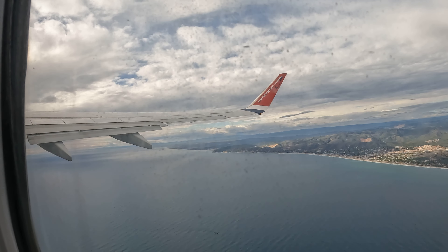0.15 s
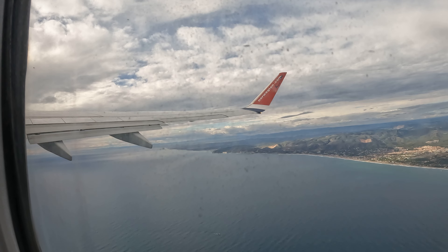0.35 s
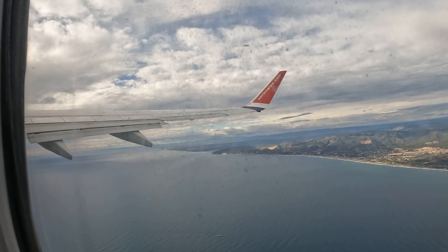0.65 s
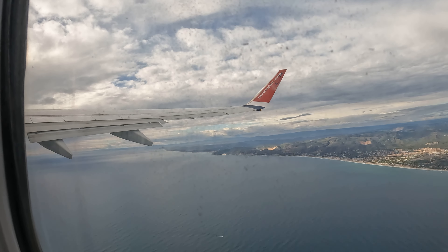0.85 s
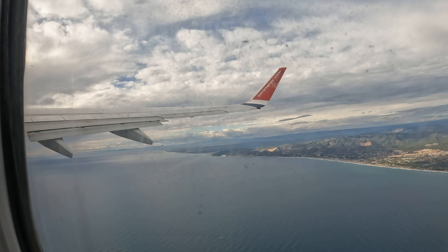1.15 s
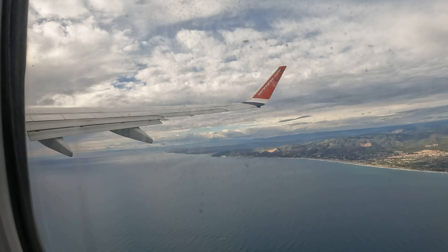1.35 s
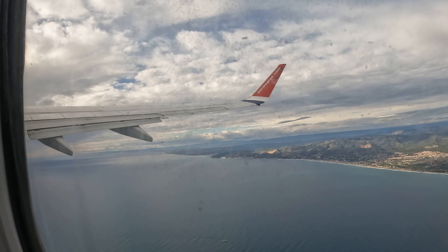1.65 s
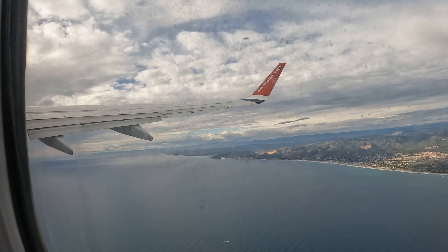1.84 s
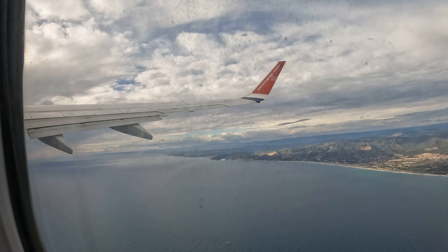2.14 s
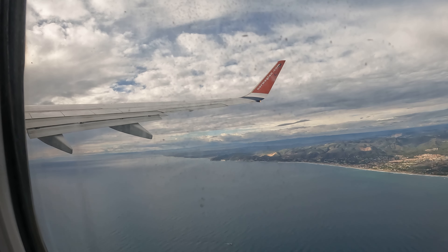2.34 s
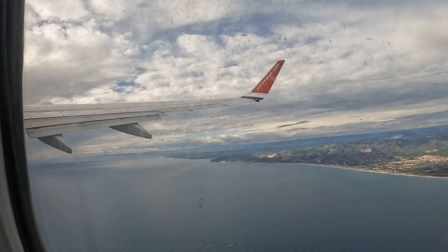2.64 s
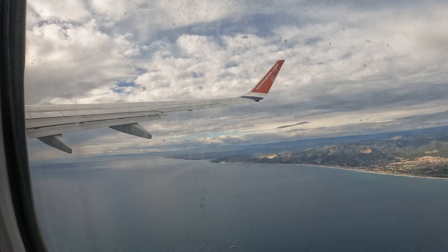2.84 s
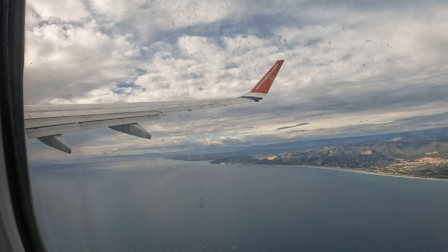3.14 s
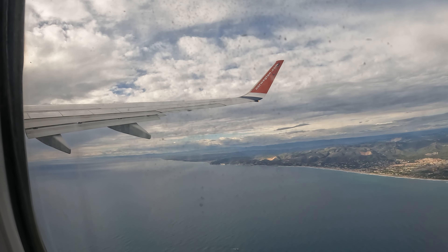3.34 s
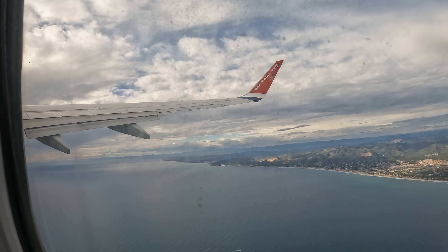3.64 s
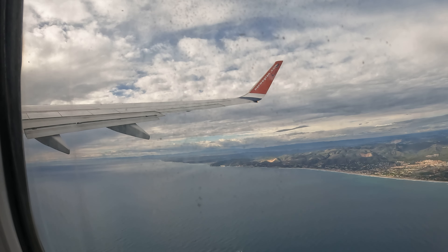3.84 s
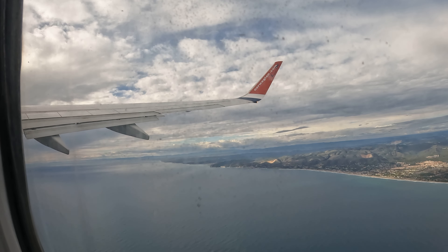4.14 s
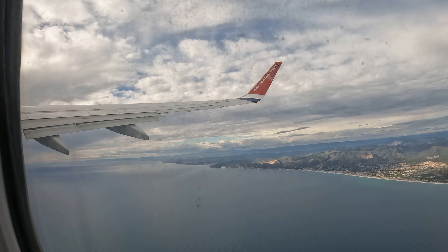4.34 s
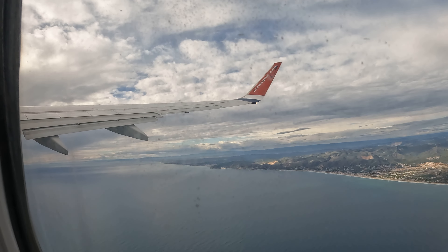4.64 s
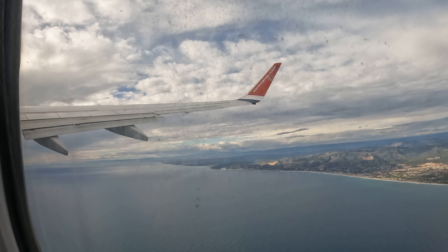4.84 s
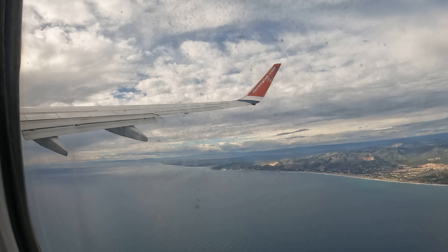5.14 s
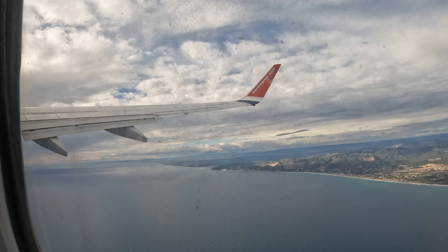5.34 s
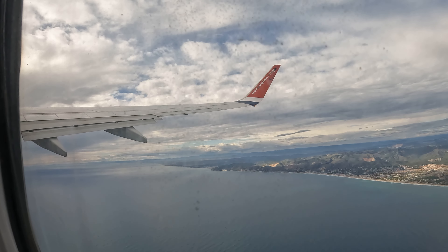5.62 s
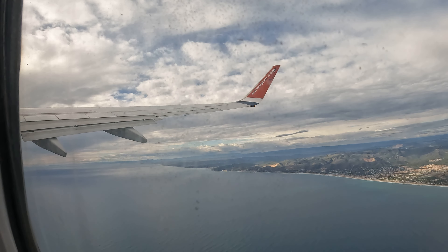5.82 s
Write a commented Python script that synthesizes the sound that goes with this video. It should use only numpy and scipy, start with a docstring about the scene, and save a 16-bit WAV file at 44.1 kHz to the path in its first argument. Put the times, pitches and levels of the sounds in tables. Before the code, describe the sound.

Steady deep booming rumble inside a cruising airliner cabin, with faint engine hum, soft air rush and tiny plastic ticks.

```python
"""Window seat in a cruising airliner

Turbulent air and the jet exhaust shake the fuselage, which booms in the cabin: low noise with resonances.
Under it the engine shafts hum faintly, as slightly wavering sine tones.
Air rushes along the skin and from the vents: brighter, wider noise coloured by the ducts.
The plastic wall trim ticks and crackles softly with the vibration: tiny bursts of ringing noise."""
import sys
import numpy as np
from scipy import signal
from scipy.fft import rfft, irfft
from scipy.io import wavfile
from scipy.ndimage import uniform_filter1d, minimum_filter1d

SR = 44100
rng = np.random.default_rng(int(sys.argv[2]) if len(sys.argv) > 2 else 0)


def master_out(mix):
    """Clip the mix to full scale and print it as 16-bit PCM to the path in sys.argv[1]."""
    frames = np.transpose(np.atleast_2d(mix))
    ceiling = np.clip(frames, -1, 1)
    pcm = np.round(ceiling * 32767).astype(np.int16)
    wavfile.write(sys.argv[1], SR, pcm)


N = 263718  # length in samples, about 6 s
TIMES = np.arange(N) / SR  # s
FREQS = np.maximum(np.arange(N // 2 + 1) * SR / N, 1)  # Hz, kept above 0 for the logarithm


def undb(db):
    """Turn decibels into a gain."""
    return 10 ** (np.asarray(db) / 20)


def level(x, db):
    """Scale to an rms (average strength) given in dB."""
    return x * undb(db) / np.sqrt(np.mean(x ** 2))


def contour(points):
    """Draw a gain curve through (f/Hz, level/dB) points, falling away steeply above the last."""
    hz, db = np.transpose(points)
    curve = undb(np.interp(np.log(FREQS), np.log(hz), db))
    return curve * np.minimum(1, hz[-1] / FREQS) ** 4


def resonances(modes):
    """Draw a gain curve with a rounded peak at each resonance, where a body answers most strongly."""
    lift_db = 0
    for hz, width, db in modes:
        lift_db = lift_db + db / (1 + (2 * (FREQS - hz) / width) ** 2)
    return undb(lift_db)


def colour(x, gain):
    """Filter a sound by giving each frequency its own gain."""
    return irfft(rfft(x) * gain, N)


def noise(gain):
    """Make fresh random noise with the given gain at each frequency."""
    return colour(rng.standard_normal(N), gain)


def walk(rate):
    """Wander slowly by chance with an rms of 1, mostly slower than the rate in Hz."""
    slow = np.exp(-np.minimum(FREQS / rate, 20) ** 2)
    return level(noise(slow), 0)


def stereo(mid, side, left_db):
    """Make left and right from what they share (mid) and how they differ (side), leaning left."""
    left = (mid + side) * undb(left_db / 2)
    right = (mid - side) * undb(-left_db / 2)
    return np.array([left, right])


# Colour of the rumble that passes the cabin wall: f/Hz, relative level/dB per Hz
RUMBLE_COLOUR = [(8, -26.5), (28, -14.5), (44, -4.5), (66, -2.5), (98, -5), (135, -7), (160, -1.5),
                 (215, -0.5), (252, -5.5), (310, -6.5), (348, -12.5), (410, -19.5), (500, -26.5),
                 (570, -38.5), (900, -74)]
# How wide the rumble sounds: f/Hz, side minus mid level/dB
RUMBLE_WIDTH = [(50, -27.5), (120, -31), (200, -30), (280, -23), (400, -21.5), (900, -12.5)]
# Resonances of the cabin air and the wall panels: f/Hz, width/Hz, lift/dB
CABIN_MODES = [(47.7, 7.9, 4), (118.6, 22, 5.5), (151.8, 14, 2.5), (188, 75, 2), (269.7, 9.1, 3.5),
               (307, 6.7, 3), (416, 25, 3)]


def rumble(rumble_db=-11.5):
    """Turbulence shakes the wall and rings the cabin; the longest waves reach both ears almost alike."""
    wall = contour(RUMBLE_COLOUR) * resonances(CABIN_MODES)
    mid = noise(wall)
    side = noise(wall * contour(RUMBLE_WIDTH))
    return level(stereo(mid, side, left_db=0.18), rumble_db)


# Hum of the engine shafts: f/Hz, rms level/dB
SHAFT_TONES = [(78.5, -29), (276, -36.5)]


def engines(pitch_wander=0.0044, strength_wander_db=3):
    """Shaft unbalance hums through the wing, wavering a little in pitch (a fraction) and in strength."""
    hum = 0
    for hz, db in SHAFT_TONES:
        pitch = hz * (1 + pitch_wander * walk(rate=3.1))
        phase = 2 * np.pi * np.cumsum(pitch) / SR
        strength = undb(strength_wander_db * walk(rate=3))
        hum = hum + level(np.sin(phase) * strength, db)
    return hum


# Colour of the air along the skin and from the vents: f/Hz, relative level/dB per Hz
AIR_COLOUR = [(150, -5.5), (480, 3), (700, 0.6), (850, -5.5), (1050, -5.5), (1300, -9.5), (1800, -14.5),
              (2500, -18), (3900, -23), (5000, -29), (7000, -34.5), (8500, -46), (12400, -53),
              (15000, -72.5)]
# Resonances of the air ducts: f/Hz, width/Hz, lift/dB
DUCT_MODES = [(603, 24, 5.5), (793, 23, 6), (943, 130, 5), (1140, 50, 2), (1540, 100, 4), (2040, 110, 3.5),
              (3260, 130, 1), (3900, 170, 1)]
# How wide the air noise sounds: f/Hz, side minus mid level/dB
AIR_WIDTH = [(300, -2), (700, -15.5), (1000, -10.5), (1400, -7), (2300, -5), (4000, -5.5), (7000, -6),
             (13000, 1.5)]


def airflow(air_db=-42, left_db=1.7, flutter_db=0.4):
    """Moving air makes a wide rush, coloured by the ducts, that flutters with the eddies."""
    ducts = contour(AIR_COLOUR) * resonances(DUCT_MODES)
    mid = noise(ducts)
    side = noise(ducts * contour(AIR_WIDTH))
    flutter = undb(flutter_db * walk(rate=24))
    return level(stereo(mid, side, left_db) * flutter, air_db)


# Rustles, where the trim slips harder for a moment: middle t/s, lift of the crackle level/dB
RUSTLES = [(0.135, 5), (0.54, 5), (0.79, 3), (1.145, 5.5), (1.254, 4), (1.335, 5.5), (1.455, 4.5),
           (1.727, 8.5), (1.83, 2), (2.144, 2.5), (2.937, 5), (3.284, 4.5), (3.527, 6), (3.65, 5),
           (3.845, 4), (3.996, 3.5), (4.155, 4.5), (4.212, 2.5), (4.49, 5), (4.944, 5), (5.199, 3.5),
           (5.5, 4)]


def crackle_power(crackle_db=-65.5, shake_db=0.8, spread_db=1.7, slip_s=0.0018, rustle_half_s=0.016):
    """Panel edges slip in 5000 tiny bursts of friction at random times, swelling into rustles."""
    chance = rng.random(size=(5000, 2))
    places = (chance[:, 0] * N).astype(int)
    slips = np.zeros(N)
    # most slips are small, a few much larger
    slips[places] = undb(-spread_db * np.log(1 - .995 * chance[:, 1]))
    # each slip starts at once and then dies away
    friction = signal.lfilter([1], [1, -np.exp(-2 / (slip_s * SR))], slips ** 2)
    rustle_db = 0
    for middle, db in RUSTLES:
        rustle_db = rustle_db + db / (1 + ((TIMES - middle) / rustle_half_s) ** 2)
    swell = undb(shake_db * walk(rate=12) + rustle_db)
    return level(np.sqrt(friction) * swell, crackle_db) ** 2


# The clearest single slips of the trim: start t/s, peak level/dB before the shared tick_db is added
TICKS = [(0.0932, -50.5), (0.3177, -53.5), (0.5166, -54), (0.5376, -53), (0.8043, -47.5), (0.8335, -55),
         (0.9119, -54), (1.3174, -54), (1.5993, -52), (1.8188, -50), (2.141, -49.5), (2.3197, -51),
         (2.9307, -50), (2.9366, -47), (3.037, -54), (3.3942, -49), (3.526, -48), (3.7759, -50),
         (4.1425, -47.5), (4.162, -49), (4.4057, -46), (4.6743, -51), (4.8973, -47.5), (4.9243, -48),
         (5.019, -51), (5.1075, -48), (5.458, -47), (5.4909, -46), (5.8527, -46.5)]


def tick_power(tick_db=-6.0, decay_s=0.006):
    """A clear slip starts at once, and every tick dies away at the same rate."""
    power = np.zeros(N)
    for start, db in TICKS:
        age = TIMES[TIMES >= start] - start
        fade = np.exp(-np.minimum(2 * age / decay_s, 20))
        power[N - len(age):] += undb(db + tick_db) ** 2 * fade
    return power


# Zones of the trim's ring that swell on their own, as the slips move along the panel edge: centre f/Hz
TRIM_ZONES = [2500, 4000, 5500, 6500, 7100, 7900, 10000, 12000]


def patchy_scrape(patchy_db=1.5, rate=40):
    """Rough edges make white noise whose overlapping bands each waver in level, at a rate in Hz."""
    scrape = 0
    for band in np.eye(len(TRIM_ZONES)):
        # a band is strongest at its own centre and fades out towards its neighbours
        gain = np.sqrt(np.interp(FREQS, TRIM_ZONES, band))
        scrape = scrape + noise(gain) * undb(patchy_db * walk(rate))
    return level(scrape, 0)


# Colour of the dull body of the plastic trim: f/Hz, relative level/dB
TRIM_COLOUR = [(800, 0), (2000, 2), (4000, 2), (5000, 0.5), (7000, -2.5), (8500, -12), (10600, -15.5),
               (11450, -20), (12500, -19), (15000, -33)]
# Rings of the plastic trim: f/Hz, width/Hz, lift/dB
TRIM_MODES = [(5850, 300, 2), (6480, 260, 5), (7020, 260, 4), (7830, 300, 5), (10000, 450, 7),
              (12100, 550, 4)]


def trim(side_db=-7):
    """Slipping panel edges scrape, and the plastic rings; no two slips have quite the same colour."""
    strength = np.sqrt(crackle_power() + tick_power())
    ring = level(contour(TRIM_COLOUR) * resonances(TRIM_MODES), 0)
    mid = colour(strength * patchy_scrape(), ring)
    side = colour(strength * rng.standard_normal(N), ring)
    return stereo(mid, undb(side_db) * side, left_db=3.0)


def scene():
    """Add up everything heard at the seat."""
    return rumble() + engines() + airflow() + trim()


def record(dry, ceiling_db=-3.5, hold_s=0.022, top_hz=15300):
    """A look-ahead limiter eases down the biggest swells, and a steep filter cuts the top."""
    size = int(hold_s * SR) | 1  # an odd number of samples
    peak = np.abs(dry).max(axis=0) + 1e-9
    gain = np.minimum(1, undb(ceiling_db) / peak)
    gain = minimum_filter1d(gain, size)
    # two running averages make the gain move smoothly
    gain = uniform_filter1d(uniform_filter1d(gain, size), size)
    top_cut = signal.ellip(8, .1, 70, top_hz, fs=SR, output="sos")
    return signal.sosfilt(top_cut, dry * gain)


dry = scene()
out = record(dry)
master_out(out)
```